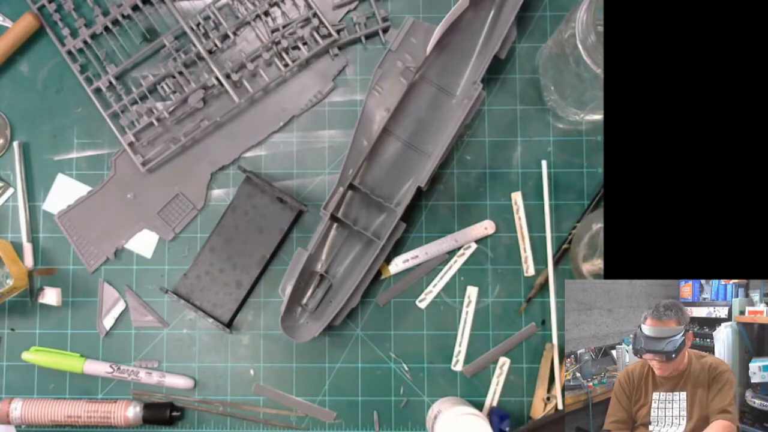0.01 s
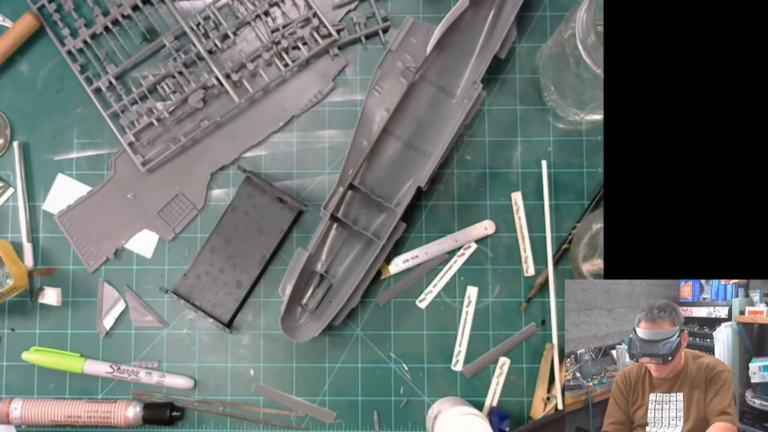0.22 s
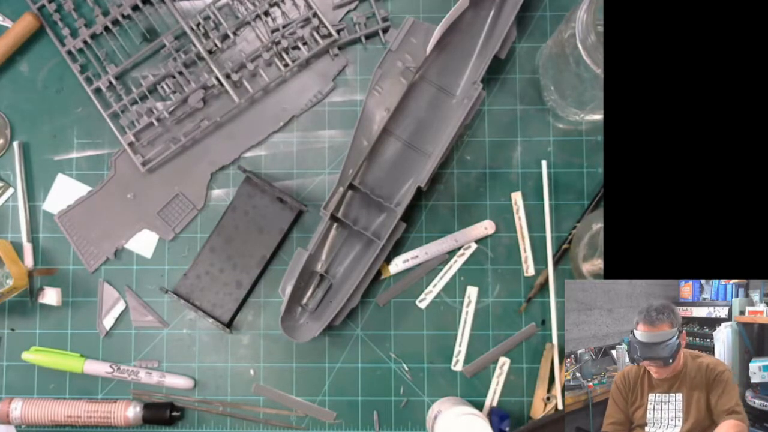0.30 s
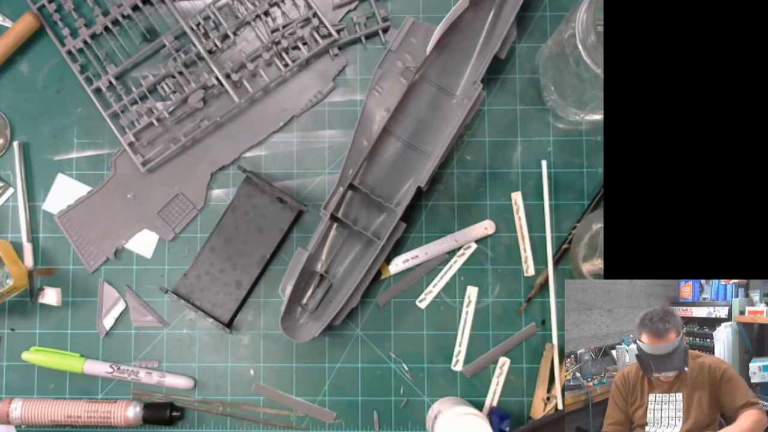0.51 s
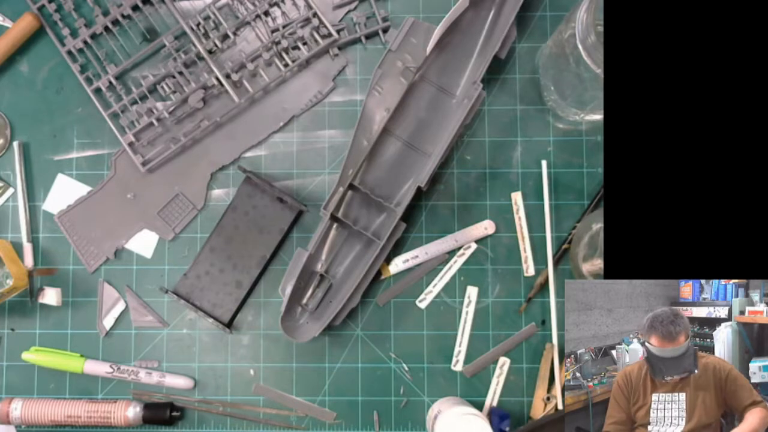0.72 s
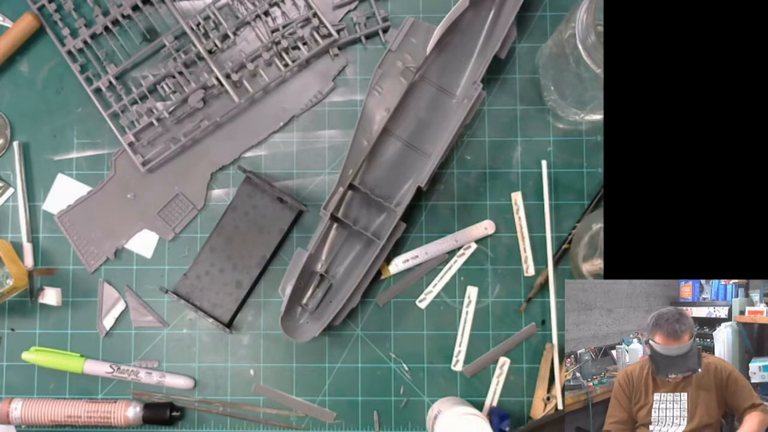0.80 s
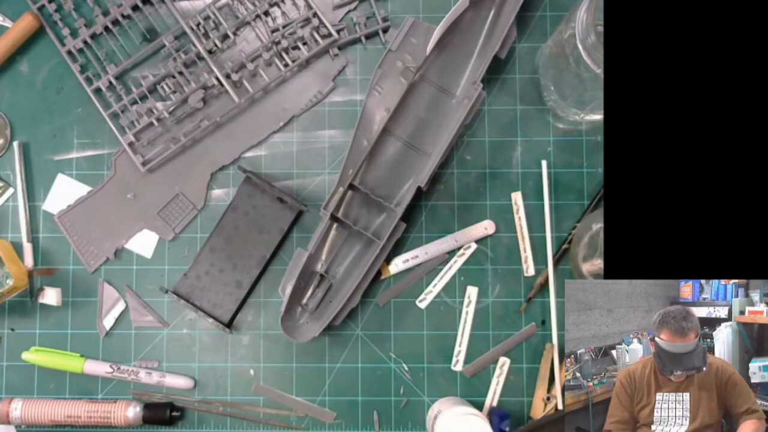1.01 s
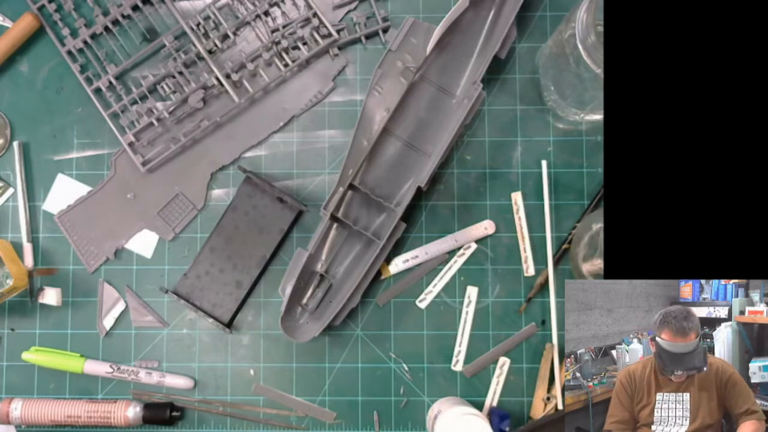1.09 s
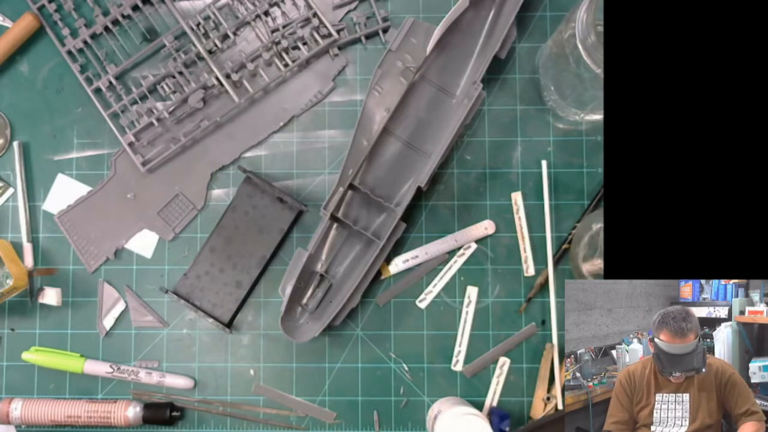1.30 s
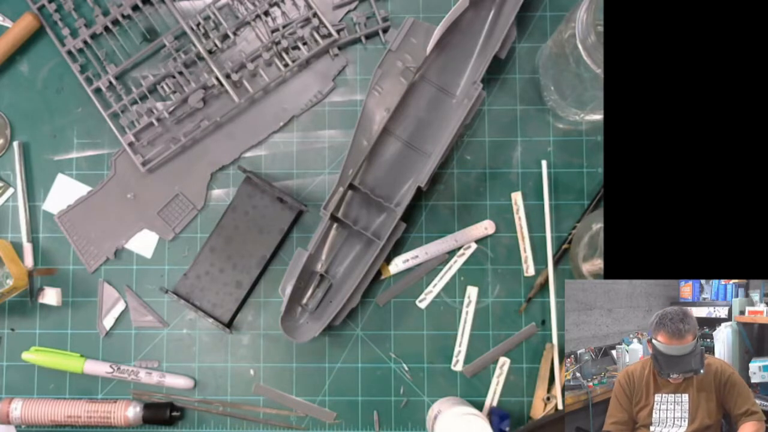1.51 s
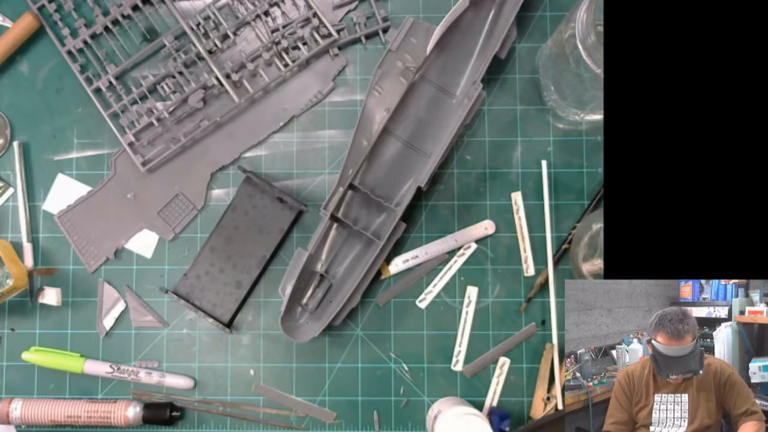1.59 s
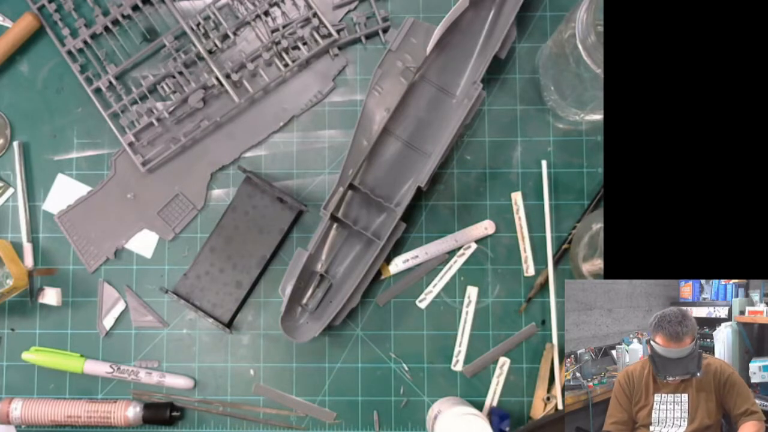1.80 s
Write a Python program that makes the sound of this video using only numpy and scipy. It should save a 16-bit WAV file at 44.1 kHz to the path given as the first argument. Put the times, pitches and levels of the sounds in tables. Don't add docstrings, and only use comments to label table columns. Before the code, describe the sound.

Steel cutters snip a plastic part at 0.2 s: a very brief creak, then a loud, sharp crack with dry knocks and bright metallic chatter, the part bouncing until about 0.3 s. A steady low fan hum and soft airy rush continue. Faint spring ticks come near 1.36 and 1.43 s, then a quiet scraping handle click and soft low hand thud at 1.6 s. Close microphone, small damped room.

```python
import sys
import numpy as np
from scipy import signal
from scipy.fft import rfft, irfft, next_fast_len
from scipy.io import wavfile
from scipy.ndimage import map_coordinates

SR = 44100
rng = np.random.default_rng(int(sys.argv[2]) if len(sys.argv) > 2 else 0)


def magnitude_from_level(level_db):
    exponent = np.asarray(level_db, float) / 20
    return 10 ** exponent


def bounce(signal):
    frames = np.transpose(np.atleast_2d(signal))
    limited = np.clip(frames, -1, 1)
    pcm = np.round(limited * 32767).astype(np.int16)
    wavfile.write(sys.argv[1], SR, pcm)


N = 79380


def squeeze():
    # f/Hz, width/Hz, level/dB
    yields = [(2000, 700, -0.5), (3900, 580, -2), (6500, 3000, -16.5)]
    start_s, rise_s, break_s, level_db = .169, .018, 0.2055, -56
    t = np.arange(N) / SR
    rise = np.clip((t - start_s) / rise_s, 0, 1) * (t < break_s)
    return rise * magnitude_from_level(level_db + 1.8 * wobble(250)) * resonant(yields)


def snip():
    # t/s, crack/dB, plastic knock/dB, handle ring/dB, jaw ring/dB
    contacts = [(0.2043, -43.5, -38, -60, -51), (0.2055, -12, -21.5, -42, -42),
                (0.2077, -23.5, -40.5, -60, -61), (.2102, -10, -30, -50.5, -21.5),
                (0.213, -16.5, -29, -24, -40), (0.2166, -21, -39.5, -40, -40),
                (.2225, -36, -31, -50.5, -49.5), (.2432, -32.5, -35, -40.5, -55.5),
                (0.2637, -17, -28, -32, -49.5), (0.2676, -30, -33, -49, -38.5),
                (.2805, -47, -46, -48.5, -53), (.2915, -33, -39.5, -51, -61), (.3005, -53, -52, -59, -67)]
    # t/s, level/dB, t60/s
    shivers = [
        (0.205, -30, 0.037),
        (0.2116, -28.5, 0.048),
        (0.245, -42, 0.11),
        (.264, -38.5, .09),
    ]
    # f/Hz, level/dB, t60/s
    frame_modes = [(1314, -15, .03), (1382, -9, 0.0399), (1774, -1, .025), (1944, -7.5, .018),
                   (2215, -4, 0.022), (2345, -2.5, .02), (2510, -3, .02), (3320, -7, .012),
                   (3940, -3.5, .012), (4606, -0.5, 0.0065), (5300, -6.5, 0.0034), (7910, 2, .015)]
    # f/Hz, level/dB, t60/s
    arm_modes = [(4597, -11, 0.0847), (4755, -13.5, .07), (5750, -22, .05), (6147, 1.5, .085),
                 (6884, -21.5, .05), (7709, -8.5, 0.17), (7867, -7, 0.072), (7903, -5, .1),
                 (7984, -11.5, .05)]
    # f/Hz, level/dB, t60/s
    jaw_modes = [(8904, -26, .05), (10020, -26.5, .04), (11000, -3.5, 0.0551), (11000, -13, .04),
                 (12658, -2, .075), (13563, 3.5, .075), (14100, -11.5, .04)]
    s, crack_db, knock_db, arm_db, jaw_db = np.transpose(contacts)
    plastic = cracks(s, crack_db, 0.0054) + cracks(*np.transpose(shivers))
    plastic = plastic + strikes(s, knock_db, frame_modes)
    steel = strikes(s, arm_db, arm_modes, 0.0011) + strikes(s, jaw_db, jaw_modes, 0.00068)
    return thin(squeeze() + plastic + steel)


def spring_ticks():
    # t/s, ring/dB, rustle/dB
    ticks = [
        (1.15, -99, -76),
        (1.312, -86, -88),
        (1.328, -65, -71.5),
        (1.345, -58, -78),
        (1.3562, -47.5, -67),
        (1.366, -66, -74),
        (1.421, -56.5, -65),
        (1.43, -53, -71),
        (1.443, -77, -74),
    ]
    # f/Hz, level/dB, t60/s
    spring_modes = [(4470, -16, .05), (7000, -24, .03), (9830, -7.5, 0.054), (9970, 0.5, 0.023),
                    (9980, -10.5, 0.067), (12490, -30, .04), (12900, -28, .03), (14600, -21, .04)]
    # t/s, level/dB
    pivot_hits = [
        (1.423, -74),
        (1.43, -67),
    ]
    # f/Hz, level/dB, t60/s
    pivot_modes = [(5787, 2, 0.061), (11000, -8, .04), (14570, -6, .05)]
    s, ring_db, rustle_db = np.transpose(ticks)
    spring = strikes(s, ring_db, spring_modes, 0.0013)
    pivot = strikes(*np.transpose(pivot_hits), pivot_modes, .0012)
    return thin(spring + pivot + cracks(s, rustle_db, 0.078))


def closing_scrape():
    # t/s, level/dB, t60/s
    clicks = [
        (1.567, -77, .3),
        (1.580, -69, .2),
        (1.588, -71, 0.12),
        (1.598, -41, 0.036),
        (1.606, -49, .05),
        (1.612, -55, .06),
        (1.621, -56, 0.063),
        (1.630, -64, 0.15),
    ]
    # f/Hz, width/Hz, level/dB
    handle = [(2003, 1100, -22), (3600, 940, -17.5), (5150, 190, -8.5), (5600, 199, -5), (5910, 170, 0),
              (6880, 350, -12.5), (7750, 600, -20), (8400, 540, -11), (10030, 220, -1.5),
              (11300, 500, -15.5), (12310, 300, -9), (13900, 900, -19), (15350, 180, -11)]
    return thin(bursts(*np.transpose(clicks), 0.0014) * resonant(handle))


def hand_on_mat():
    # f/Hz, width/Hz, level/dB
    mat = [(150, 40, 0), (352, 120, 2.5), (750, 400, -3.5), (1070, 120, -0.5)]
    s, level_db, t60_s, attack_s = 1.59, -53.5, .25, 0.011
    return bursts(s, level_db, t60_s, attack_s) * resonant(mat)


def strikes(times, levels_db, modes, attack_s=.0001):
    scatter_db = 1.5
    out, t = np.zeros(N + SR), np.arange(SR // 8) / SR
    hz, level_db, t60 = np.transpose(modes)[:, :, None]
    decay = magnitude_from_level(level_db - 60 * t / t60)
    rings = decay * np.sin(2 * np.pi * hz * t) * (1 - np.exp(-t / attack_s))
    chance = rng.standard_normal((len(times), len(modes), 2))
    for s, db, c in zip(times, levels_db, chance):
        strength = magnitude_from_level(scatter_db * c[:, 0]) * np.sign(c[:, 1])
        out[round(s * SR):][:len(t)] += magnitude_from_level(db) * strength @ rings
    return out[:N]


def cracks(times, levels_db, t60):
    # f/Hz, level/dB
    spectrum = [(1350, -14.5), (1520, -25), (2300, -9), (2900, -18), (4700, -0.5), (9500, -14.5),
                (12500, -10.5), (16000, -21.5)]
    return bursts(times, levels_db, t60, .0001) * coloured_noise(spectrum)


def bursts(times, levels_db, t60s, attack_s):
    out, t = np.zeros(N + SR), np.arange(SR // 6) / SR
    for s, db, t60 in np.broadcast(times, levels_db, t60s):
        out[round(s * SR):][:len(t)] += magnitude_from_level(db - 60 * t / t60) * (1 - np.exp(-t / attack_s))
    return out[:N]


def thin(x):
    highpass = signal.cheby2(N=8, rs=45, Wn=1288 * .85, btype="high", fs=SR, output="sos")
    return signal.sosfilt(highpass, x)


def room(x):
    # f/Hz, t60/s
    reverb = [(1000, 0.23), (3000, .18), (6000, 0.13), (8000, .18), (15000, .13)]
    delay_s = .004
    hz, t, z = signal.stft(rng.standard_normal(SR // 2), SR, nperseg=128)
    decay = magnitude_from_level(-60 * t / along(reverb, hz)[:, None])
    tail = signal.istft(z * decay, SR, nperseg=128)[1]
    late = np.pad(x, (round(delay_s * SR), 0))
    return signal.fftconvolve(late, tail / np.linalg.norm(tail))[:N]


def motor_hum():
    # f/Hz, rms level/dB
    lines = [(59, -75), (90, -60.5), (119.8, -73), (141.5, -76.5), (257.7, -68)]
    t, hum = np.arange(N) / SR, np.zeros(N)
    for hz, db in lines:
        level = np.sqrt(2) * magnitude_from_level(db + 1.6 * wobble(5.7))
        phase = .15 * wobble(2.5) + rng.uniform(0, 2 * np.pi)
        hum += level * np.sin(2 * np.pi * hz * t + phase)
    return hum


def duct_tone():
    # f/Hz, width/Hz, level/dB
    duct = [(315, 25, -2), (344.2, 27, -0.5), (387, 25, -7), (516, 4.2, -3), (620, 23, -7), (790, 28, -8),
            (906, 27, -13), (1150, 20, -12.5)]
    # t/s, level/dB
    swell = [(0, -70.5), (.2, -64.5), (.45, -68.5), (.7, -69.5), (.9, -70.5), (.98, -62), (1.05, -66),
             (1.11, -67), (1.18, -63.5), (1.25, -70), (1.45, -65.5), (1.6, -64.5), (1.69, -64.5),
             (1.8, -69)]
    t = np.arange(N) / SR
    return magnitude_from_level(np.interp(t, *np.transpose(swell)) + 1.5) * resonant(duct)


def rushing_air():
    # f/Hz, density/dB
    rumble = [(15, -6.5), (40, 0), (170, 1.5), (215, -1.5), (245, 4.5), (290, -4), (430, -8), (480, 1),
              (700, -5.5), (910, -30), (1540, -120)]
    # f/Hz, density/dB
    hiss = [(410, -32), (700, -3), (900, -4.5), (1570, -10), (2120, -10.5), (2830, -14.5), (5000, -24),
            (10700, -39.5), (15800, -43)]
    return magnitude_from_level(-66) * coloured_noise(rumble) + magnitude_from_level(-66) * coloured_noise(hiss)


def unit(x):
    return x / np.sqrt(np.mean(x ** 2) + 1e-20)


def along(points, hz):
    f, v = np.transpose(points)
    return np.interp(np.log(hz + 1), np.log(f + 1), v)


def filtered(x, response):
    m = next_fast_len(N + SR // 2)
    return irfft(rfft(x, m) * response(np.fft.rfftfreq(m, 1 / SR)), m)[..., :N]


def coloured_noise(spectrum):
    return unit(filtered(rng.standard_normal(N), lambda hz: magnitude_from_level(along(spectrum, hz))))


def resonant(peaks):
    def body(f):
        total = 0
        for k, (centre, width, db) in enumerate(peaks):
            damping = 1j * f * width
            total = total + (-1) ** k * magnitude_from_level(db) * damping / (centre * centre - f * f + damping)
        return total
    return unit(filtered(rng.standard_normal(N), body))


def wobble(rate):
    knots = rng.standard_normal(int(N * rate / SR) + 4)
    return map_coordinates(knots, [np.arange(N) * rate / SR])


def scene():
    room_db, side_db = -12.5, -44
    tool = snip() + spring_ticks() + closing_scrape() + hand_on_mat()
    fan = motor_hum() + duct_tone() + rushing_air()
    mono = tool + magnitude_from_level(room_db) * room(tool) + fan
    return mono * (1 + magnitude_from_level(side_db) * wobble(900) * np.array([[1], [-1]]))


def top_cut(x):
    return signal.sosfilt(signal.butter(12, 16370, fs=SR, output="sos"), x)


def record(dry):
    mix = filtered(dry, lambda hz: (1 - np.tanh((hz - 15720) / 25)) / 2)
    return top_cut(mix)


dry = scene()
out = record(dry)
bounce(out)
```